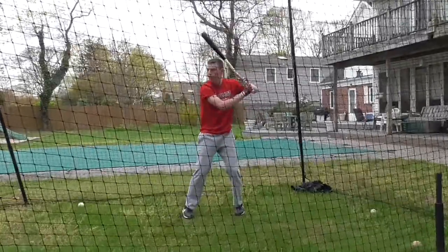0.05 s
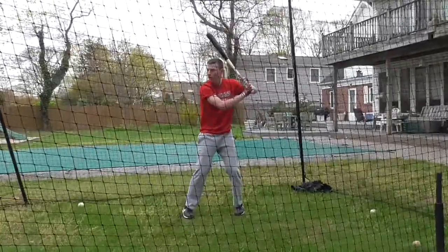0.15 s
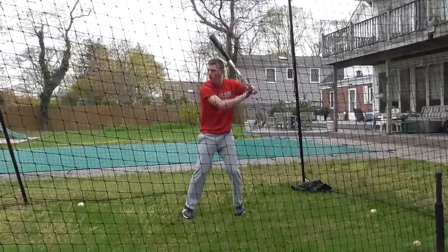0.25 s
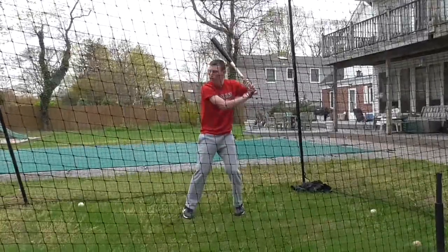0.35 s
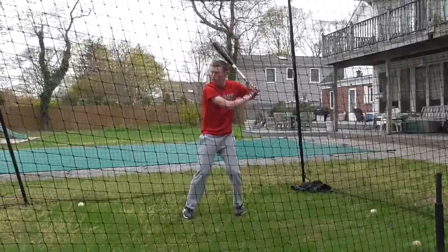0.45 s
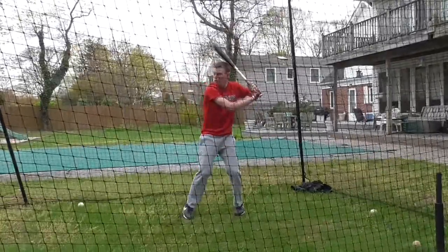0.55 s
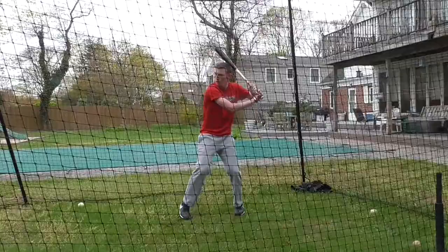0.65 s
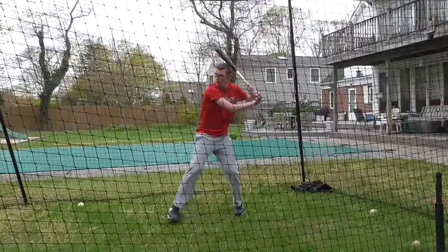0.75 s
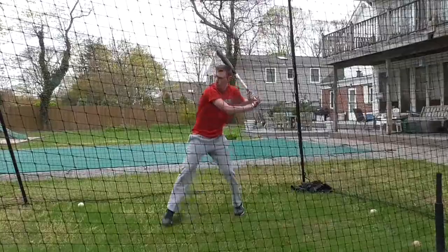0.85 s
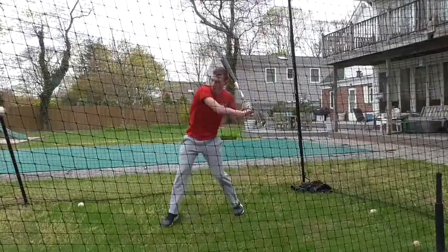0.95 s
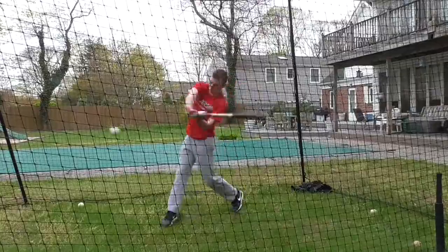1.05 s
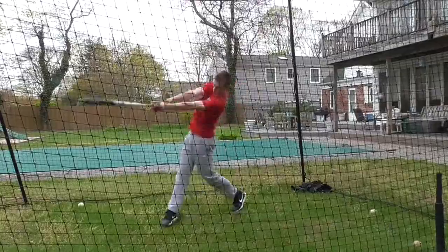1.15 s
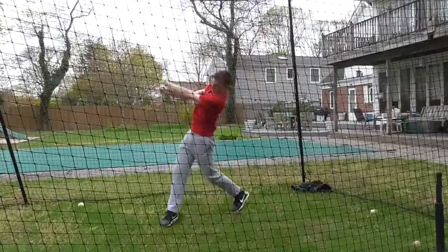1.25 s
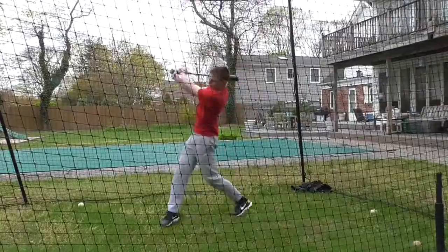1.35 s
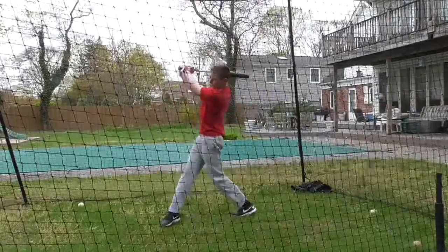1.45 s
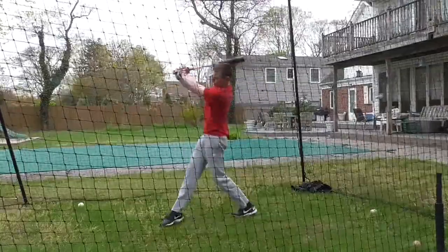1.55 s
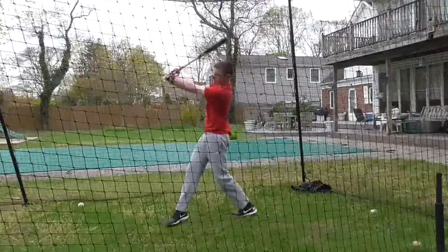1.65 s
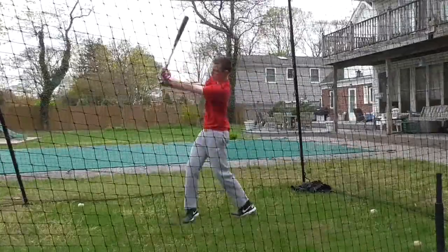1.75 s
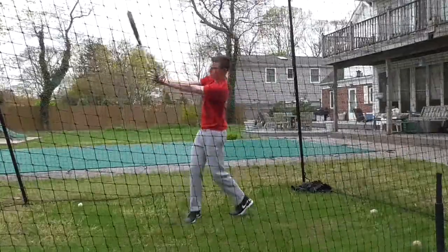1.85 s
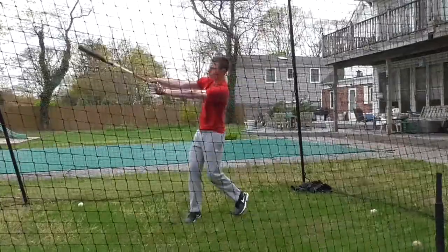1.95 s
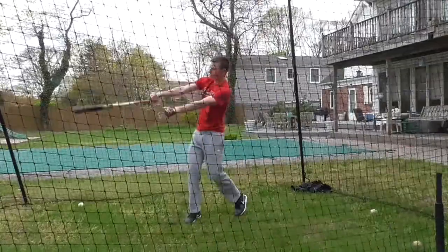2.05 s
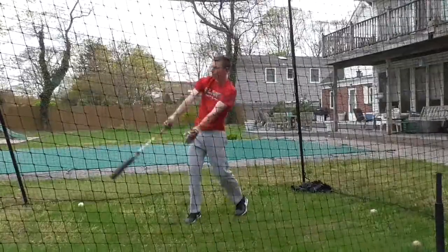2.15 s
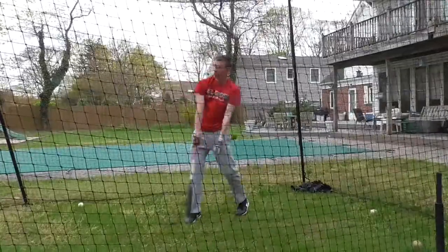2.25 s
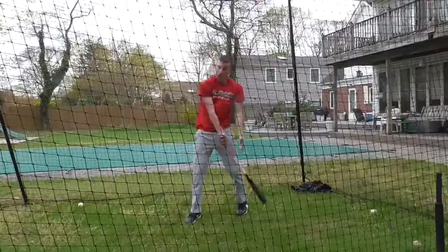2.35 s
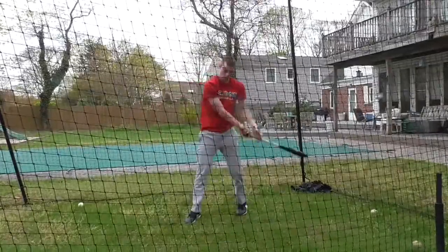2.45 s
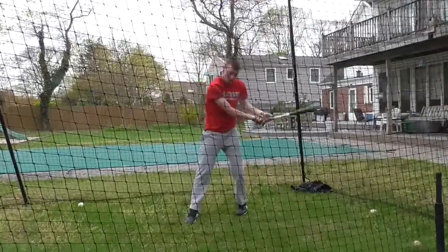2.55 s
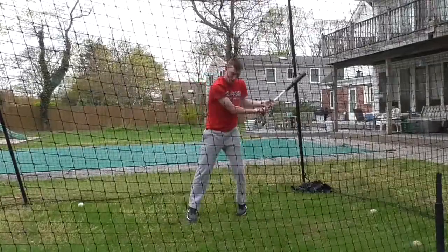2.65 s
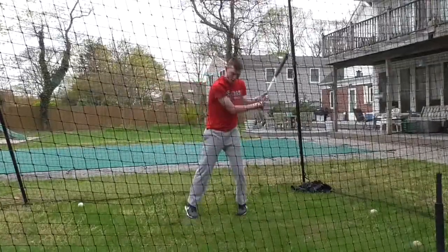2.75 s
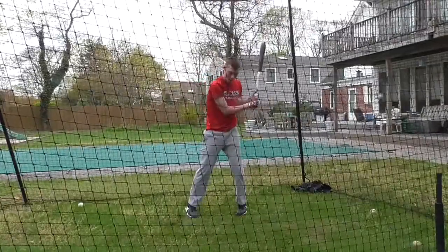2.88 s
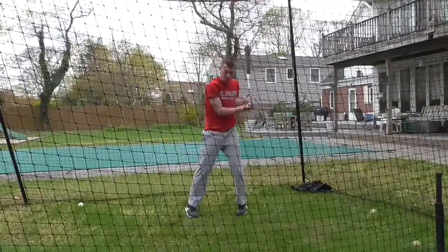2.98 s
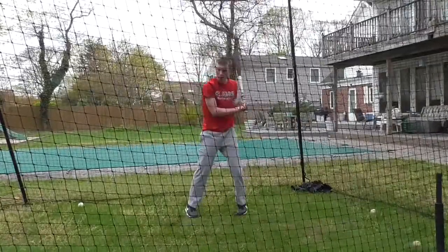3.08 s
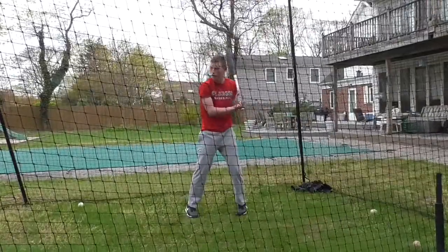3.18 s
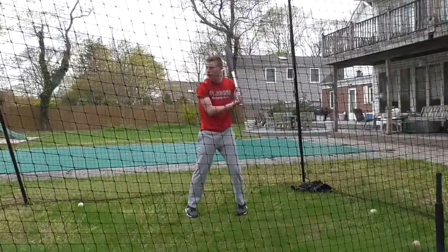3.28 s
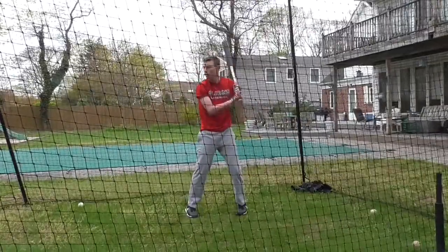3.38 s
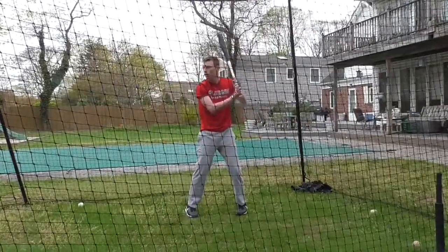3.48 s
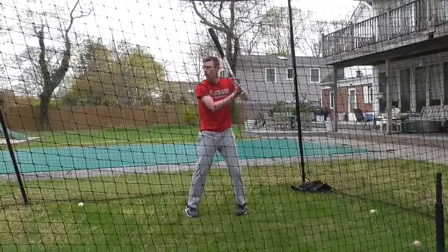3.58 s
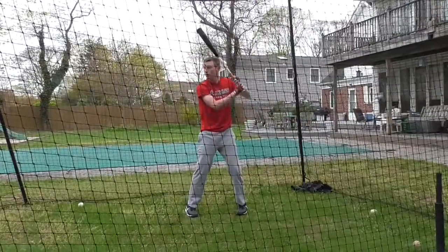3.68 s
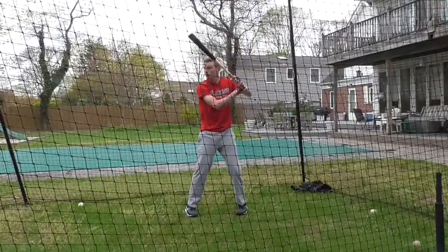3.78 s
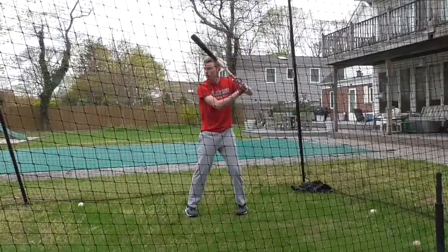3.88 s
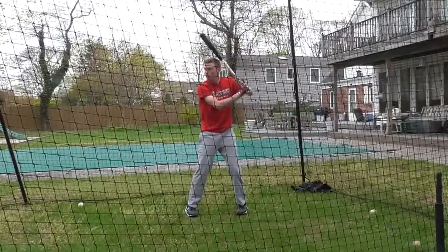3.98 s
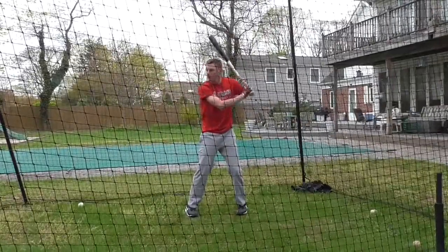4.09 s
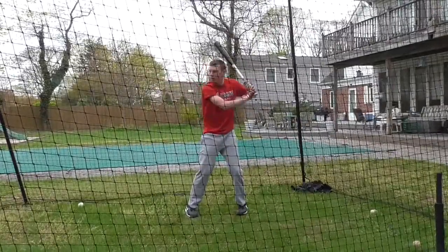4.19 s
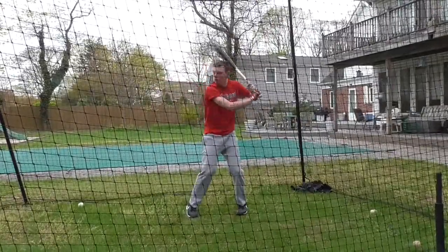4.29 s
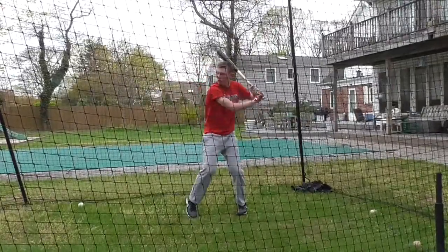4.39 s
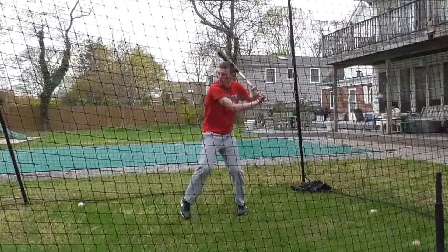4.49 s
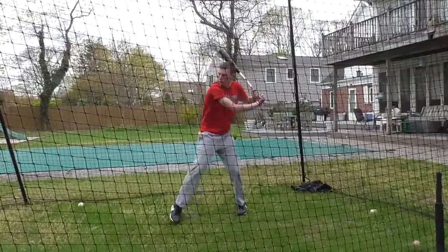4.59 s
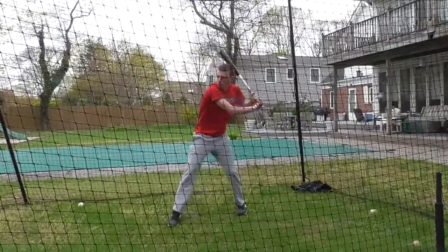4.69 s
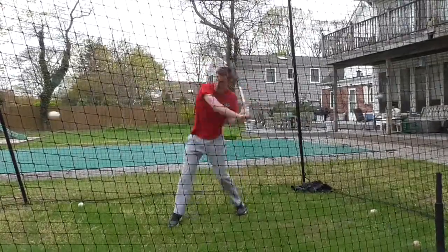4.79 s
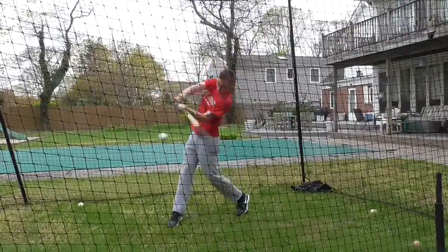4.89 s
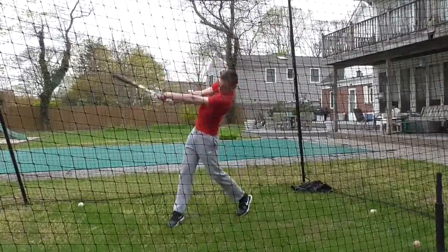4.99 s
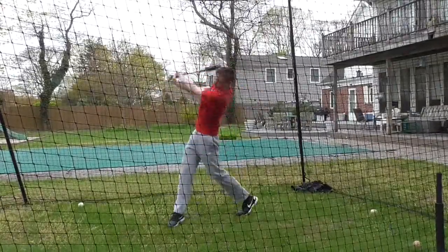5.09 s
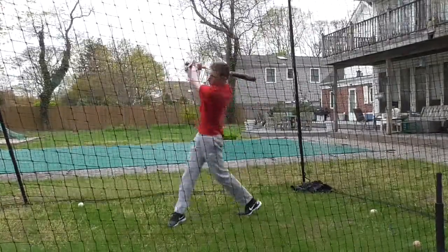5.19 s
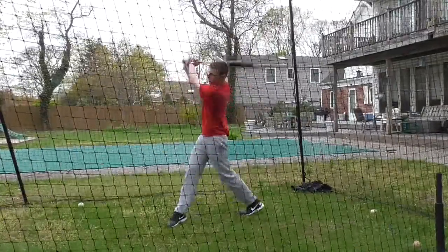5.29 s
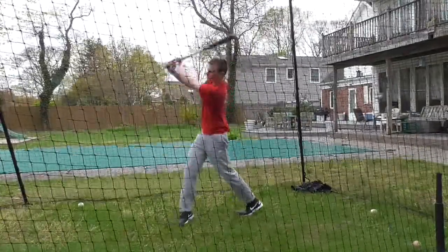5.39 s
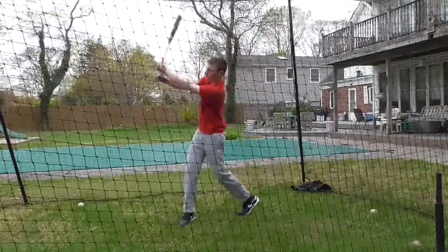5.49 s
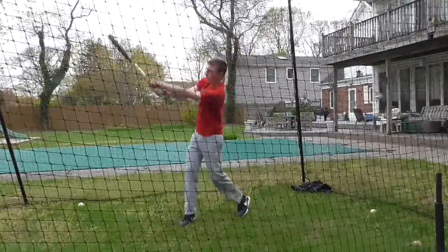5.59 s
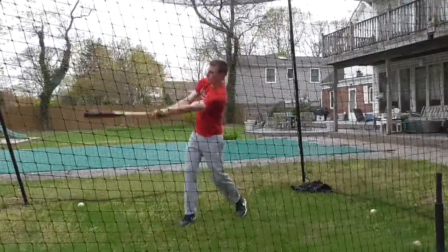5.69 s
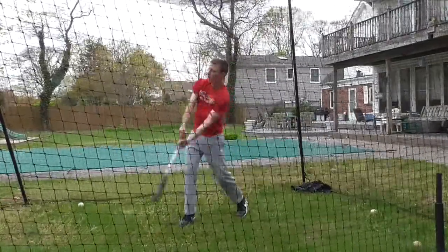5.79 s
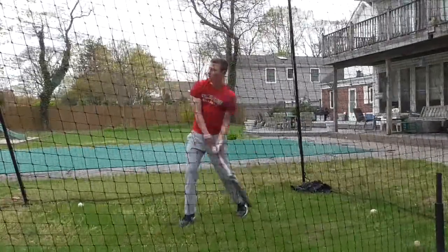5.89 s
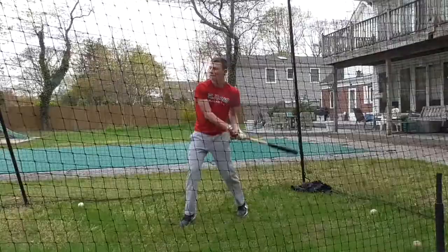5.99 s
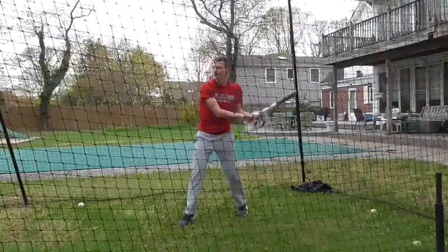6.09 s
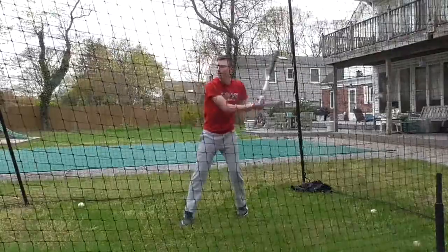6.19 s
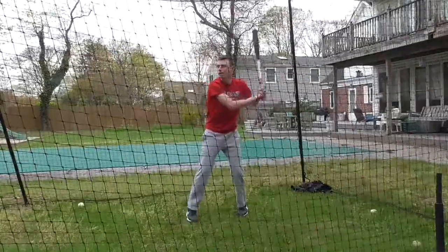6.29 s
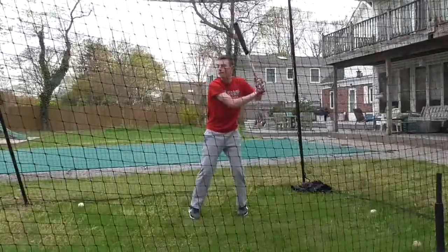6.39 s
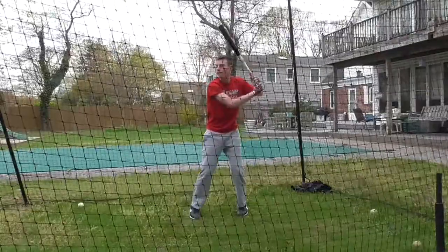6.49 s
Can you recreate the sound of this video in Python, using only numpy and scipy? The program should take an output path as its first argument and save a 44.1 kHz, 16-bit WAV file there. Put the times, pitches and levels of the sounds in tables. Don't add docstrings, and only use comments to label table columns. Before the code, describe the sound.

Outdoors in a backyard, soft distant traffic and faint high chirps. A bat cracks a ball sharply, with quick slaps off lawn and house walls; the ball rushes into netting with ticks, bright metal clip jingles and dull knocks, then drops on grass. Birds slur, buzz, trill and call. A second, fuller crack and net rustle follow. Stereo microphone a short way off, close to the net.

```python
import sys
import numpy as np
from scipy import signal
from scipy.fft import rfft, irfft, next_fast_len
from scipy.io import wavfile
from scipy.ndimage import uniform_filter1d

SR = 44100
rng = np.random.default_rng(int(sys.argv[2]) if len(sys.argv) > 2 else 0)


def dump_mix(stems):
    frames = np.atleast_2d(stems).T
    limited = np.clip(frames, -1, 1)
    pcm = np.round(limited * 32767).astype(np.int16)
    wavfile.write(sys.argv[1], SR, pcm)


def field_ratio(decibels):
    return 10 ** (np.asarray(decibels, dtype=float) / 20)


N = 288414

# [f/Hz, density/dB]
ROAD = [(15, -47.5), (25, -32), (51, -31), (87, 0.5), (128, 0), (349, -7.5), (854, -3.5), (1180, -9),
        (1600, -19.5), (2670, -36), (4860, -40), (5720, -46.5), (9850, -36), (12600, -37.5), (15200, -48),
        (16500, -67)]
ROAD_DB = -44
# [t/s, level/dB]
ROAD_LEVEL = [(0.0, -0.5), (6.54, -0.5)]
# [f/Hz, coherence/1]
SAME = [(60, 0.96), (150, 0.96), (380, 0.78), (950, 0.57), (2380, 0.33), (5980, 0.15), (15000, 0.06)]
# [f/Hz, level/dB]
PORT = [(4800, 0), (5600, -4), (6500, -4), (7400, 2.5), (8700, -2.5), (10000, 1.5), (10900, -2.5),
        (12000, 0.5)]
# [t/s, level/dB]
BREEZE = [(0, 2), (.6, -0.5), (3.4, 1.5), (3.9, -3), (4.5, -2.5), (5, 1), (6.54, 1)]
# [f/Hz, share/1]
LEAVES = [(2200, 0), (3500, 0.99), (7000, 1), (9500, .2)]
# [f/Hz, density/dB]
HUM = [(60, -19), (69, 8), (74, 16.5), (79, 13), (90, -40)]
HUM_DB = -57.5

# [f/Hz, density/dB]
TWINE = [(3240, -19.5), (5500, -1), (6110, -2.5), (7590, 3), (9000, -2.5), (11600, -1.5), (15000, -16.5),
         (16500, -31.5)]
# [f/Hz, density/dB]
BODY = [(300, -37), (900, 2), (2500, -8), (4000, -2.5), (5500, -13), (8000, -34.5)]
# [peak t/s, level/dB, swell/s, fade/s, body level/dB]
RUSHES = [(1.155, -60, 0.054, 0.36, -3), (1.222, -61, 0.065, 0.022, 2), (1.3, -61, 0.029, 0.075, 5.5),
          (1.44, -57.5, 0.187, 0.07, -7), (1.465, -71.5, 0.176, 0.137, 21),
          (1.538, -42, 0.0085, 0.096, -10.5), (1.556, -35.5, 0.0123, 0.022, -1),
          (1.57, -46.5, .02, 0.205, 0), (1.8, -66.5, 0.099, 0.297, 0), (4.95, -69.5, 0.147, 0.22, -2.5),
          (5.023, -59.5, 0.032, .02, 3), (5.09, -54, 0.094, 0.12, 5), (5.2, -66, 0.038, 0.15, 14),
          (5.254, -41.5, 0.0128, 0.149, -4), (5.165, -64, .02, 0.0246, 14), (5.21, -63, 0.017, 0.027, 16),
          (1.41, -64.5, 0.0293, .06, 15.5), (5.385, -52.5, 0.056, 0.1346, -4.5)]
# [peak t/s, level/dB, swell/s, fade/s]
SWAYS = [(0.019, -64.5, 0.0146, 0.049), (1.1, -74.5, 0.15, 0.047), (2.024, -61, 0.017, 0.075),
         (2.08, -61.5, 0.0165, 0.079), (1.98, -70, 0.045, .08), (2.1, -70, .1, 0.13),
         (2.19, -75, 0.146, 0.45), (2.332, -64.5, 0.0295, 0.09), (2.61, -66.5, 0.2, .3),
         (2.91, -77.5, 0.096, 0.133), (5.565, -65.5, 0.167, 0.69), (5.82, -73.5, 0.073, 0.078),
         (5.915, -70.5, 0.15, .04), (6.0, -75, .1, 0.34), (6.122, -67, 0.056, 0.125),
         (6.32, -73.5, 0.21, .4), (6.46, -68, .06, 0.087)]
SWAY_BODY_DB = -4
NET_SAME_DB, NET_LEAD = 1.5, 3

# [start t/s, length/s, first f/Hz, last f/Hz, level/dB]
NOTES = [(0.171, 0.092, 4350, 4310, -79.5), (0.244, 0.083, 4268, 4320, -71),
         (0.36, 0.073, 4295, 4280, -70.5), (0.532, .09, 4290, 4290, -85.5), (0.619, 0.034, 4270, 4230, -69),
         (0.665, 0.077, 4228, 4200, -68), (0.775, 0.055, 4280, 4200, -69.5),
         (0.819, 0.0557, 4213, 4240, -68), (0.917, 0.105, 4200, 4277, -84), (1.96, .06, 8200, 8100, -69.5),
         (2.247, 0.0905, 8230, 8015, -65.5), (1.888, 0.0345, 2480, 2384, -66.5),
         (2.163, 0.0406, 2524, 2346, -64.5), (2.254, 0.097, 3250, 3175, -71), (2.101, .1, 3300, 3230, -77),
         (2.23, 0.194, 6600, 6510, -75.5), (3.32, 0.034, 2650, 2290, -70),
         (3.449, 0.0126, 5300, 4610, -64.5), (3.61, 0.0282, 4200, 4440, -70)]
NOTE_ENDS_DB = -4.5
# [start t/s, dive t/s, end t/s, held f/Hz, level/dB]
SLURS = [
    (2.4, 2.468, 2.495, 4130, -55.5),
    (2.455, 2.506, 2.533, 4420, -57),
    (2.398, 2.442, 2.45, 4400, -58.5),
    (2.434, 2.487, 2.507, 4270, -59),
    (2.47, 2.498, 2.51, 4200, -62),
    (2.505, 2.524, 2.548, 4400, -64),
    (2.528, 2.548, 2.568, 4400, -64),
    (2.572, 2.59, 2.603, 4330, -66),
    (2.515, 2.536, 2.55, 4300, -65),
]
SCOOP_S, SCOOP_HZ, DIVE_HZ_PER_S, DIVE_DB, SLUR_ENDS_DB = 0.015, 750, 56000, -4.5, -10
WARBLE_HZ, WARBLE_PER_S = 35, 40
# [start t/s, length/s, f/Hz, level/dB, share of length at the loudest/1]
BUZZ = (2.582, .32, 6965, -55, .3)
# [at the start/dB, at the end/dB]
BUZZ_ENDS_DB = (-11, -21)
# [t/s, level/dB]
TRILL = [(2.83, -64.5), (2.865, -61), (2.9, -55.5), (2.94, -57), (2.97, -63.5), (3.12, -63), (3.2, -61),
         (3.29, -67.5), (3.32, -77.5)]
TRILL_PER_S, TRILL_TIRES, TRILL_TILT_DB_PER_KHZ = 48.6, 4.2, -1.5
TRILL_BLUR_S, TRILL_BLUR_DB = .05, -3
# [start t/s, held/s, f/Hz, level/dB]
CLEAR = (3.468, .11, 3640, -52.5)
CLEAR_RISE_S, CLEAR_SAG_HZ, CLEAR_DROP_S, CLEAR_DROP_DB = .018, 70, .06, -13
LINGER_S, LINGER_DB, LINGER_FLUTTER_DB_PER_S = .44, -20, 20

CRACK_TIMES = [1.23163, 5.03263]
# [peak level/dB, sharpness/dB, pan/dB]
CRACKS = [
    (-5.8, -2, 0.5),
    (-3.8, -4.5, 0.0),
]
# [f/Hz, level/dB, t60/s]
BAT = [(620, 0, .0115), (500, -12, .017), (424, -12.5, .02), (975, -20.5, .021)]
CONTACT_S, SNAP_S = .001, .00022
# [f/Hz, level/dB, t60/s]
PUSH = (285, -9.5, .028)
# [f/Hz, density/dB]
SNAP = [(1000, -29), (1700, -5), (3640, 1.5), (6310, -4), (11000, -3), (14600, -9.5), (16500, -29)]
BITE_AT = [1700, 2250, 2850, 3550, 4500, 5600, 11200, 14000]
BITE_DB = [(-1, -7, -8, 2, 1, -5, 6, 0), (-1, 9, -2, -3, 7, -2, -3, 3)]
# [f/Hz, level/dB]
NO_BOOM = [(165, -19), (270, 0)]
# [delay/s, level/dB, treble level/dB, pan/dB, smear/s]
LAWN_ECHOES = [
    (.00204, -1.6, 0, 1.5, .0003),
    (.00405, -13, -3, 1, .0008),
    (.0069, -21.5, -1, 1, .0015),
]
# [delay/s, level/dB, treble level/dB, pan/dB, left late/samples]
ECHOES = [(0.014, -25.5, 1, 5, 2.5), (0.024, -29, 9, 6, 13.5), (0.0357, -30, 21, -8, 4),
          (0.042, -40, -4.5, -10, -6), (0.0483, -20, 4, -2.5, 10), (.0575, -19.5, -2, -1, -1.5),
          (.064, -22.5, -4, 1, 3.5), (0.074, -29, -3.5, -2, 7)]
WALL_SMEAR_S = 0.00088
# [delay/s, f/Hz, level/dB, t60/s, rise/s]
SIDING = (.03505, 830, -1, .014, .002)
# [delay/s, level/dB, treble level/dB, pan/dB, left late/samples]
FAR_WALL = (.1658, -28.5, 8, 1.6, -1)
FAR_SMEAR_S = .0003
FAR_BOOST_DB = [0, .6]
# [f/Hz, level/dB]
WALL = [(250, -15), (500, -7.5), (900, 0), (1500, 7), (3000, 3)]
# [f/Hz, level/dB]
AIR = [(3500, 2), (6500, -3.5), (10500, -0.5), (14000, -9)]
# [f/Hz, level/dB]
FAR_AIR = [(2000, 5.5), (5000, 2), (8500, -10)]
# [f/Hz, t60/s]
YARD = [(200, 0.29), (700, 0.44), (2000, 0.56), (5000, 0.414), (12000, 0.22)]

# [t/s, peak level/dB, centre f/Hz]
TICKS = [(1.305, -41.5, 3300), (1.344, -41.5, 3800), (1.364, -38.5, 3600), (5.266, -39, 2200),
         (1.439, -42.5, 3320), (1.4398, -39, 11000), (1.2775, -37.5, 11000), (1.2812, -30.5, 3300),
         (1.2887, -32, 3500), (5.0788, -39, 10000), (5.0823, -29.5, 3300), (5.0897, -34, 3600),
         (1.865, -50.5, 10000), (1.887, -49.5, 11020), (1.4644, -55, 3490), (1.5529, -30.5, 12000),
         (1.6293, -32, 3630), (1.777, -44.5, 6800), (1.8193, -42.5, 4520), (2.0209, -50.5, 6500),
         (2.016, -51, 12040), (2.027, -50, 7000), (2.083, -47, 7000), (2.0757, -47, 6500),
         (2.3196, -53, 5320), (5.246, -44.5, 9000), (5.251, -32, 11400), (5.88, -54, 7000),
         (6.017, -57.5, 4700), (5.415, -45, 4500), (5.2573, -28.5, 4400), (5.268, -34, 13500),
         (5.275, -40, 7200), (5.3445, -43.5, 12500), (5.349, -42, 12500), (5.354, -40, 12000),
         (5.359, -44, 12000), (5.374, -43.5, 12600), (5.378, -39, 11200), (5.39, -44, 12500),
         (5.395, -47, 12000), (1.5376, -33.5, 3360), (1.556, -32.5, 3500), (1.601, -35.5, 3500),
         (5.555, -44, 7300), (5.8077, -48, 9000), (5.8595, -56, 4500), (5.914, -56, 10000),
         (5.9665, -49, 6150), (6.0452, -52, 8000), (6.1144, -49, 10400), (6.1293, -53, 10100)]
TICK_PAN_DB = 9
# [f/Hz, level/dB, t60/s, family: 0 high, 1 middle]
CLIPS = [(5157, -7, .2, 1), (5231, -1, .3, 1), (5286, -3, .22, 1), (5355, -2, .28, 1), (9970, -4, .18, 0),
         (10090, -9, .2, 0), (10148, -5, .22, 0), (10280, -9, .2, 0), (10444, -2, .16, 0),
         (10700, -8, .08, 0), (10990, -13, .07, 0), (11220, -14, .08, 0)]
# [t/s, high level/dB, middle level/dB]
CLINKS = [(1.553, -14.5, -32), (1.5728, -18.5, -38.5), (1.601, -21, -41.5), (1.6247, -57, -40),
          (1.6492, -40.5, -51), (1.701, -37, -63.5), (1.7771, -41, -46), (1.8198, -39.5, -58.5),
          (2.0188, -42, -51), (2.044, -37.5, -67), (2.077, -38, -43), (2.1085, -42.5, -52),
          (2.3216, -39, -46), (2.6, -49.5, -61), (5.597, -36.5, -48.5), (5.68, -61.5, -72.5),
          (5.7616, -60.5, -63.5), (5.8627, -46, -57), (5.9185, -50.5, -65), (6.0222, -57, -66),
          (6.0841, -42.5, -60), (6.12, -44.5, -66), (6.1795, -51.5, -68)]
MIDDLE_DB = -5
# [t/s, peak level/dB, f/Hz, t60/s, sign of first swing]
KNOCKS = [(1.5537, -17.5, 636, 0.0159, 1), (1.561, -25, 336.6, 0.0387, 1), (1.575, -26, 215, 0.0288, -1),
          (1.597, -27, 211.4, 0.0355, 1), (1.592, -27, 772, 0.0125, -1), (1.611, -38, 260, 0.0255, 1),
          (1.64, -42.5, 230, 0.036, 1), (2.2199, -25, 286, 0.0373, -1), (2.237, -37.5, 260, 0.052, -1),
          (5.262, -36.5, 254, 0.0565, 1), (2.2294, -41, 378, 0.033, 1), (6.114, -31.5, 203, 0.0298, -1)]
KNOCK_SAG_PER_S, KNOCK_GRIT_DB = 19.05, -17.5
# [t/s, level/dB, time to fade 20 dB/s]
CHATTER = [
    (1.56, -57.5, 0.65),
    (2.03, -67, 0.5),
    (5.59, -70, 1.7),
]
# [t/s, f/Hz, level/dB, t60/s, damped after/s]
FRAME_RINGS = [
    (1.565, 1864, -37, .6, .042),
    (1.612, 1862, -36, .8, .055),
    (1.66, 1862, -40, .3, .3),
    (1.62812, 1831.5, -46, .8, .3),
    (1.6, 1925, -47, .3, .12),
    (1.8, 1872, -57, .5, .06),
    (1.905, 1868, -60, .5, .08),
    (2.01, 1866, -60, .7, .11),
]
FRAME_RISE_S = .012
EDGE_HZ = 15770


def evened(x):
    return x / np.sqrt(np.mean(x ** 2) + 1e-20)


def read(points, hz):
    f, value = np.transpose(points)
    return np.interp(np.log(hz + 1), np.log(f + 1), value)


def add(mix, s, sound, pan_db=0., late=0):
    voices = np.broadcast_to(sound, (2, sound.shape[-1]))
    for side, (track, voice) in enumerate(zip(mix, voices)):
        start = round(s * SR + (late if side == 0 else 0))
        part = track[start:][:len(voice)]
        part += voice[:len(part)] * field_ratio(pan_db * (1.0 - side))


def colour(x, points):
    length = x.shape[-1]
    size = next_fast_len(length)
    response = field_ratio(read(points, np.fft.rfftfreq(size, 1 / SR)))
    return irfft(rfft(x, size) * response, size)[..., :length]


def ring(hz, t60, seconds, rise=.0001):
    t = np.arange(round(seconds * SR)) / SR
    return np.sin(2 * np.pi * hz * t) * field_ratio(-60 * t / t60) * (1 - np.exp(-t / rise))


def along(rows):
    s, *columns = np.transpose(rows)
    t = np.arange(s[0], s[-1], 1 / SR)
    return s[0], t - s[0], [np.interp(t, s, c) for c in columns]


def road():
    frames, hz = N // 256 + 5, np.fft.rfftfreq(1024, 1 / SR)
    a, b, c, d, patches = rng.standard_normal((frames, 513, 5)).T
    patches = evened(uniform_filter1d(uniform_filter1d(patches, 10, 0), 16, 1))
    t = np.arange(frames) * 256 / SR
    swell_db = np.interp(t, *np.transpose(ROAD_LEVEL))
    breeze_db = np.interp(t, *np.transpose(BREEZE))
    same = np.clip(read(SAME, hz), -1, 1)[:, None]
    left = a + 1j * b
    right = same * left + np.sqrt(1 - same ** 2) * (c + 1j * d)
    steady_db = (read(ROAD, hz) + read(PORT, hz))[:, None]
    level_db = steady_db + patches + swell_db + read(LEAVES, hz)[:, None] * breeze_db
    z = np.array([left, right]) * field_ratio(level_db)
    wash = signal.istft(z, nperseg=1024, noverlap=768)[1][:, :N]
    return field_ratio(ROAD_DB + np.array([[.3], [-.3]])) * evened(wash)


def hum():
    noise = rng.standard_normal((3, N))
    return field_ratio(HUM_DB) * evened(colour(noise[2] + .18 * noise[:2], HUM))


def rustle():
    t, bright, dull = np.arange(0, N / SR + .002, .001), 0, 0
    for s, db, swell, fade, body_db in RUSHES + [(*row, SWAY_BODY_DB) for row in SWAYS]:
        power = field_ratio(db - 20 * np.maximum((s - t) / swell, (t - s) / fade)) ** 2
        bright = bright + power
        dull = dull + power * field_ratio(body_db) ** 2
    bright, dull = (np.interp(np.arange(N) / SR, t, np.sqrt(p)) for p in (bright, dull))
    unevenness = uniform_filter1d(rng.exponential(1, N), 12)
    grains = rng.standard_normal((2, 3, N)) * field_ratio(4.0 * unevenness)
    shared = np.stack([np.roll(grains[:, 2], -NET_LEAD, -1), grains[:, 2]], 1)
    grains = grains[:, :2] + field_ratio(NET_SAME_DB) * shared
    twine = field_ratio(8) * bright * evened(colour(grains[0], TWINE))
    body = field_ratio(7) * dull * evened(colour(grains[1], BODY))
    return twine + body * field_ratio(np.array([[1.5], [-1.5]]))


def sung(t, hz, db):
    ends = np.clip(np.minimum(t, t[-1] - t) / 0.0038, 0, 1)
    return np.sqrt(2) * field_ratio(db) * np.sin(2 * np.pi * np.cumsum(hz) / SR) * ends


def whistles():
    out, lines = np.zeros((2, N)), []
    for s, length, a, b, db in NOTES:
        lines.append([(s, a, db + NOTE_ENDS_DB), (s + length / 2, (a + b) / 2, db),
                      (s + length, b, db + NOTE_ENDS_DB)])
    s, held, hz, db = CLEAR
    steps = np.cumsum([s, CLEAR_RISE_S, held - CLEAR_RISE_S, CLEAR_DROP_S, LINGER_S])
    pitch = hz + CLEAR_SAG_HZ * np.array([-.5, 0.49, -0.5164, -0.0091, -0.504])
    level = db + np.array([-20, 0, -3, CLEAR_DROP_DB, CLEAR_DROP_DB + LINGER_DB])
    lines.append(np.transpose([steps, pitch, level]))
    for s, dive, end, hz, db in SLURS:
        fall_hz = DIVE_HZ_PER_S * (end - dive)
        lines.append([(s, hz - SCOOP_HZ, db + SLUR_ENDS_DB), (s + SCOOP_S, hz, db - 5.0), (dive, hz, db),
                      ((dive + end) / 2, hz - fall_hz / 2, db + DIVE_DB),
                      (end, hz - fall_hz, db + DIVE_DB + SLUR_ENDS_DB)])
    slur_starts = [row[0] for row in SLURS]
    for rows in lines:
        s, t, (hz, db) = along(rows)
        waver = evened(uniform_filter1d(rng.standard_normal(len(t)), 500))
        warble = WARBLE_HZ * np.sin(2 * np.pi * WARBLE_PER_S * t) * (s in slur_starts)
        dropout_db = LINGER_FLUTTER_DB_PER_S * t * np.maximum(-waver, 0)
        add(out, s, sung(t, hz + 12 * waver + warble, db + 1.3 * waver - dropout_db), 1.1)
    return out


def buzz():
    out = np.zeros((2, N))
    s, length, hz, db, top = BUZZ
    s, t, (db,) = along([(s, db + BUZZ_ENDS_DB[0]), (s + top * length, db), (s + length, db + BUZZ_ENDS_DB[1])])
    rate = 330 + 30 * evened(uniform_filter1d(rng.standard_normal(len(t)), 400))
    flutter = np.sin(2 * np.pi * np.cumsum(rate) / SR)
    add(out, s, sung(t, hz + 290 * flutter, db - 1.3 * flutter), 1.1)
    return out


def trill():
    out = np.zeros((2, N))
    s, t, (db,) = along(TRILL)
    wobble = evened(uniform_filter1d(rng.standard_normal((2, len(t))), 350))
    u = (t * (TRILL_PER_S - TRILL_TIRES * t) + 1.02 + 0.03 * wobble[0]) % 1
    sweep_hz = 3200 + 2450 / (1 + (u / 0.3) ** 1.9) + 90 * wobble[1]
    tilt_db = TRILL_TILT_DB_PER_KHZ * (sweep_hz - 4200) / 1000
    pulse = np.sin(np.pi * np.clip(u / 0.657, 0, 1)) ** 0.63
    sweeps = sung(t, sweep_hz, db + 1.57 * wobble[1] + tilt_db) * pulse
    blur = rng.standard_normal((2, 4000)) * field_ratio(-20 * np.arange(4000) / SR / TRILL_BLUR_S)
    blur = blur / np.linalg.norm(blur[0])
    add(out, s, sweeps, 0.2)
    add(out, s, field_ratio(TRILL_BLUR_DB) * signal.fftconvolve(sweeps[None], blur, axes=1))
    return out


def snap(smear):
    t = np.arange(1500) / SR
    noise = rng.standard_normal((3, 1500))
    noise = noise[2] + colour(noise[:2], [(4000, -10), (8000, -4)])
    burst = t / smear * np.exp(1 - t / smear) * np.sqrt(.0003 / smear)
    tail = .12 * field_ratio(-60 * t / .03) * (t > smear)
    return evened(colour(noise, SNAP)) * (burst + tail)


def arrive(heard, s, paths, ringing, db, sharp_db):
    for delay, echo_db, treble_db, side_db, late, smear in paths:
        blow = ringing + field_ratio(sharp_db + treble_db - 5.5) * snap(smear)
        add(heard, s + delay, field_ratio(db + echo_db) * blow, side_db, late)


def cracks():
    out = np.zeros((2, N))
    body = sum(field_ratio(g) / hz * np.gradient(ring(hz, t60, 1500 / SR, CONTACT_S)) for hz, g, t60 in BAT)
    body = body / abs(body).max()
    thin = np.roll(colour(np.roll(body, 200), WALL), -200) * signal.windows.tukey(1500, .01)
    lawn = [(*row[:4], 0, row[4]) for row in LAWN_ECHOES]
    walls = [(*row, WALL_SMEAR_S) for row in ECHOES]
    fade_in = np.clip(np.arange(-1980, 12020) / 20, 0, 1)
    blows = zip(CRACK_TIMES, CRACKS, BITE_DB, FAR_BOOST_DB)
    for s, (db, sharp_db, pan_db), bite_db, boost_db in blows:
        direct, near, far = np.zeros((3, 2, N))
        push_hz, push_db, push_t60 = PUSH
        add(direct, s, field_ratio(db + push_db) * ring(push_hz, push_t60, .04, CONTACT_S), 1.5)
        arrive(direct, s, [(0, 0, 0, pan_db, 0, SNAP_S)] + lawn, body, db, sharp_db)
        delay, panel_hz, panel_db, panel_t60, rise = SIDING
        add(near, s + delay, -field_ratio(db + panel_db) * ring(panel_hz, panel_t60, .03, rise), -3, 4)
        arrive(near, s, walls, thin, db, sharp_db)
        arrive(far, s, [(*FAR_WALL, FAR_SMEAR_S)], thin, db, sharp_db)
        bite = NO_BOOM + list(zip(BITE_AT, bite_db))
        far_air = [(hz, g + boost_db) for hz, g in FAR_AIR]
        around = slice(round(s * SR) - 2000, round(s * SR) + 12000)
        for heard, tint in [(direct, bite), (near, AIR), (far, far_air)]:
            out[:, around] += colour(heard[:, around], tint) * fade_in
    return out


def yard(x, start=1100, reach=0.92):
    taps = np.zeros((2, SR))
    at = np.arange(start, SR - 20, 20)
    at = at + rng.integers(0, 20, at.size)
    taps[:, at] = rng.choice([-1., 1.], (2, at.size))
    taps += 0.32 * taps[::-1]
    hz, t, z = signal.stft(taps, SR, nperseg=256)
    decay = field_ratio(-60 * t / reach / read(YARD, hz)[:, None])
    tail = signal.istft(z * decay, SR, nperseg=256)[1]
    return signal.fftconvolve(x.mean(0)[None], tail / np.linalg.norm(tail[0]), axes=1)[:, :N]


def ticks():
    out, t = np.zeros((2, N)), np.arange(600) / SR
    for s, db, hz in TICKS:
        band = [(hz / 4, -25), (hz, 0), (hz * 1.7, -14), (hz * 3, -36)]
        burst = evened(colour(rng.standard_normal(600), band))
        add(out, s + 0.001, field_ratio(db - 6.0) * burst * field_ratio(-60 * t / 0.014), TICK_PAN_DB, -3)
    return out


def clips():
    out = np.zeros((2, 2, N))
    luck = rng.standard_normal((len(CLINKS), len(CLIPS), 4))
    for (s, high_db, middle_db), draw in zip(CLINKS, luck):
        family_db = [high_db, middle_db + MIDDLE_DB]
        for (hz, db, t60, family), (a, b, c, d) in zip(CLIPS, draw):
            level = np.sign(a) * field_ratio(family_db[int(family)] + db - 6 + 2.1 * b)
            tone = ring(hz * (1 + 0.002 * d), t60, t60, 0.00023)
            add(out[int(family)], s + .002, level * tone, 3 * c, -2)
    flutter = rng.standard_normal((2, 2, N))
    flutter = evened(uniform_filter1d(uniform_filter1d(flutter, 300), 300))
    depth_db = np.array([2.2, 2.6])[:, None, None]
    return (out * field_ratio(depth_db * np.minimum(flutter, 1))).sum(0)


def knocks():
    out, t = np.zeros((2, N)), np.arange(4000) / SR
    for s, db, hz, t60, swing in KNOCKS:
        sinking_hz = hz / (1 + KNOCK_SAG_PER_S * t)
        thud = np.sign(swing) * np.sin(2 * np.pi * np.cumsum(sinking_hz) / SR)
        band = [(hz / 2, -20), (hz, 0), (hz * 3, -8), (hz * 8, -30), (hz * 16, -70)]
        grit = evened(colour(rng.standard_normal((2, 4000)), band))
        shape = field_ratio(db + 3.0 - 60 * t / t60) * (1 - np.exp(-2 * t * hz))
        add(out, s, shape * (thud + field_ratio(KNOCK_GRIT_DB + 30 * t / t60) * grit), 3.0, -5)
    return out


def chatter():
    t = np.arange(N) / SR
    swing = sum(field_ratio(db - 20 * (t - s) / fade) * (t > s) for s, db, fade in CHATTER)
    out = np.zeros((2, N))
    for hz, db, t60, family in CLIPS:
        fuzz = np.repeat(rng.standard_normal((2, N // 100 + 1)), 100, axis=1)[:, :N]
        fuzz = evened(uniform_filter1d(uniform_filter1d(fuzz, 400), 400))
        out += field_ratio(db) * fuzz * np.sin(2 * np.pi * hz * t)
    return out * swing


def frame():
    out = np.zeros((2, N))
    for s, hz, db, t60, length in FRAME_RINGS:
        tone = ring(hz, t60, length, FRAME_RISE_S)
        waver_db = 1.2 * evened(uniform_filter1d(rng.standard_normal(len(tone)), 900))
        damped = signal.windows.tukey(len(tone), min(.02 / length, 1))
        add(out, s, field_ratio(db) * tone * field_ratio(waver_db) * damped, 1.5, -3)
    return out


def scene():
    background = road() + hum() + rustle()
    song = whistles() + buzz() + trill()
    hit = cracks()
    net = ticks() + clips() + knocks()
    near_scatter = yard(field_ratio(-17.0) * colour(hit, WALL) + field_ratio(-11.5) * net)
    far_scatter = yard(field_ratio(-6.0) * song, 500, 1.75)
    rest = background + song + net + near_scatter + far_scatter + chatter() + frame()
    hit = colour(hit, [(EDGE_HZ + 1000, 0), (EDGE_HZ + 1300, -50)])
    return hit + colour(rest, [(EDGE_HZ, 0), (EDGE_HZ + 60, -50)])


def top_cut(x):
    return signal.sosfilt(signal.butter(12, 17130, fs=SR, output="sos"), x)


def record(dry):
    thin = signal.sosfilt(signal.butter(3, 60, "high", fs=SR, output="sos"), dry)
    return top_cut(thin)


dry = scene()
out = record(dry)
dump_mix(out)
```